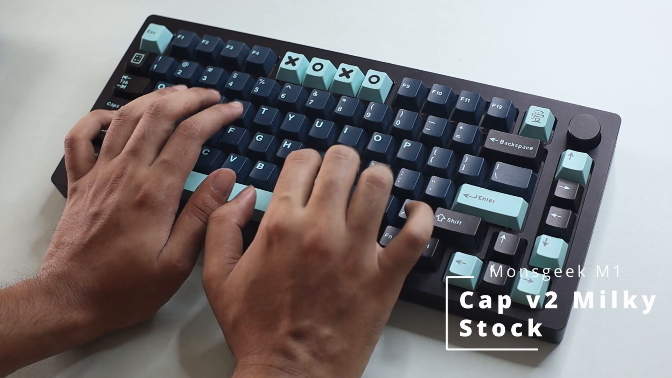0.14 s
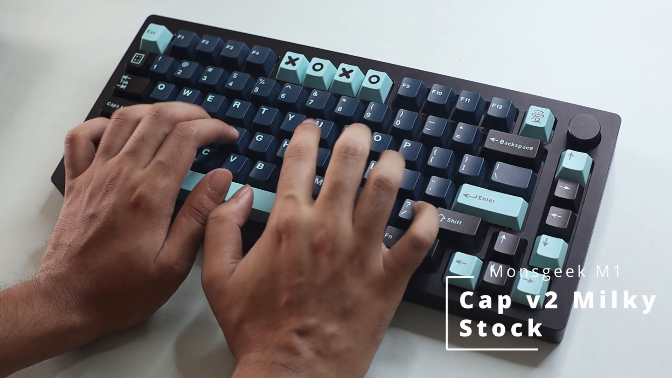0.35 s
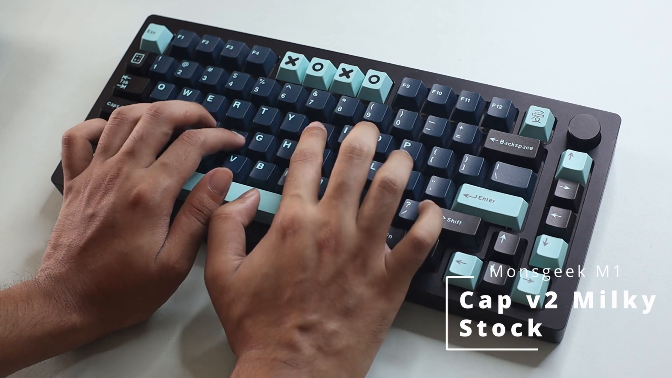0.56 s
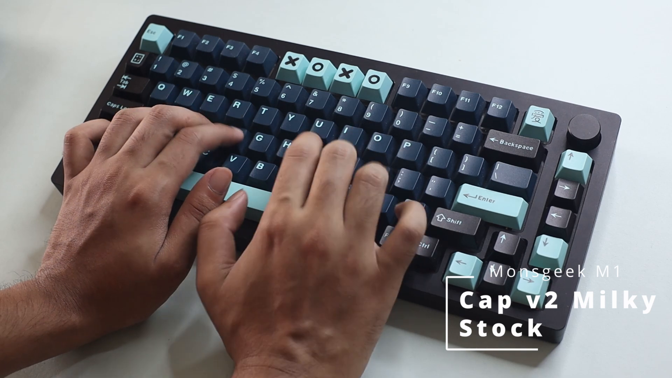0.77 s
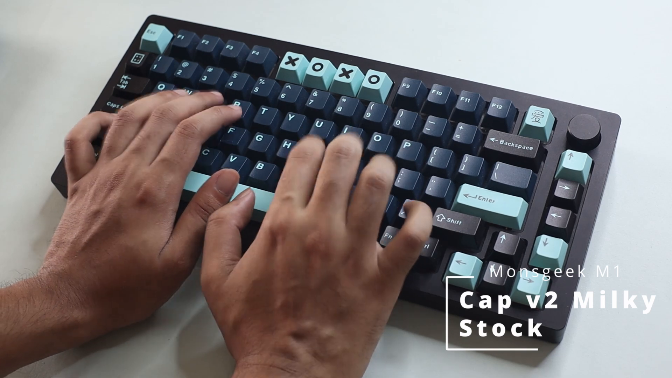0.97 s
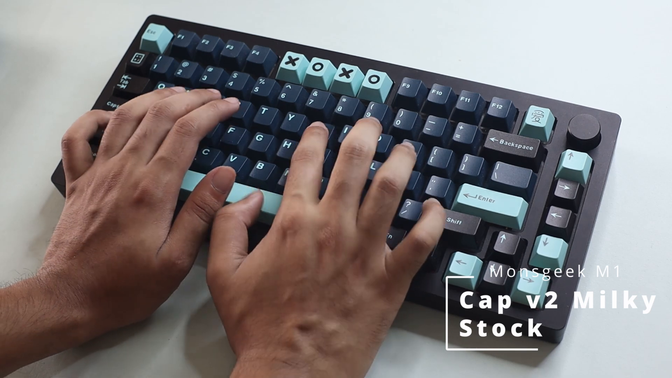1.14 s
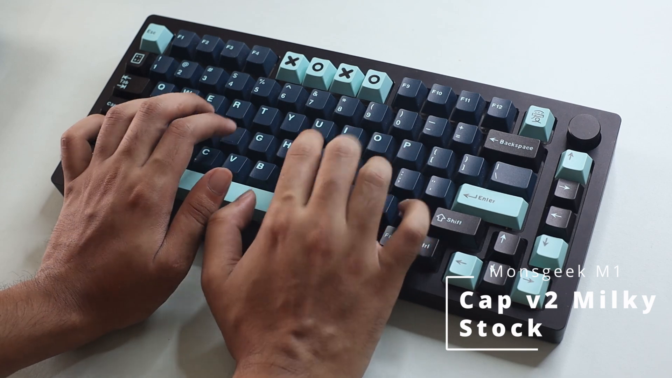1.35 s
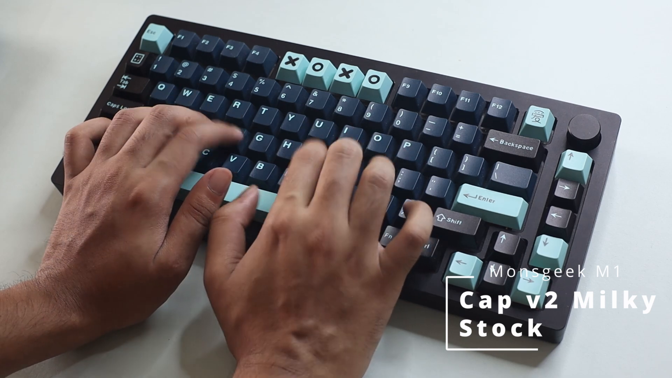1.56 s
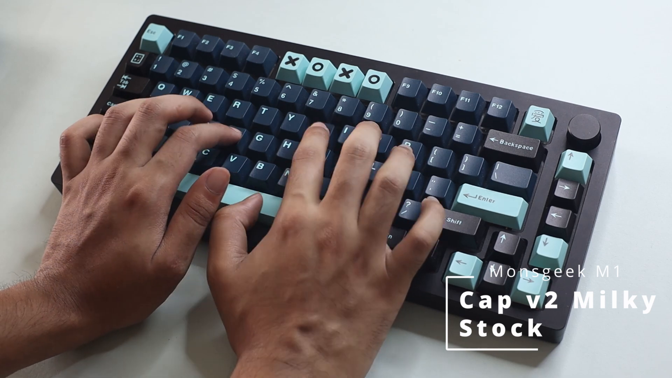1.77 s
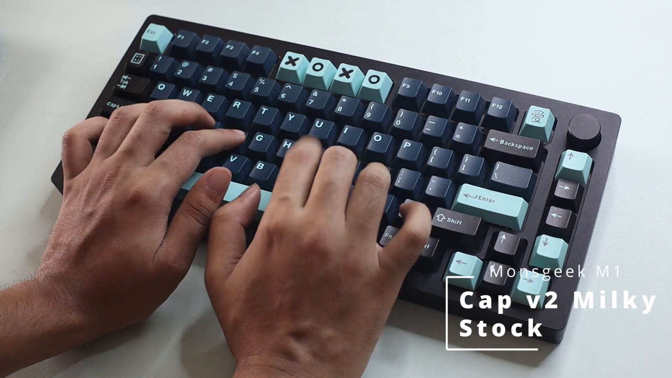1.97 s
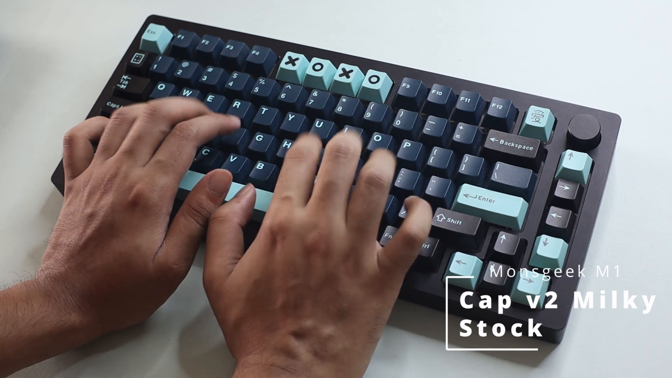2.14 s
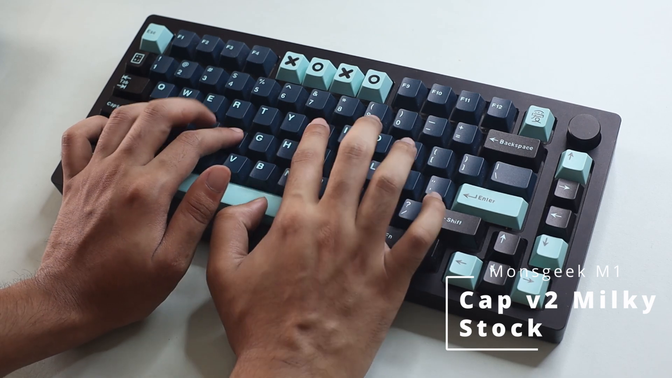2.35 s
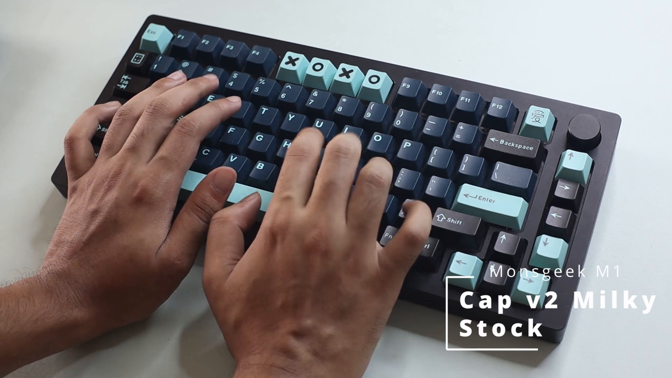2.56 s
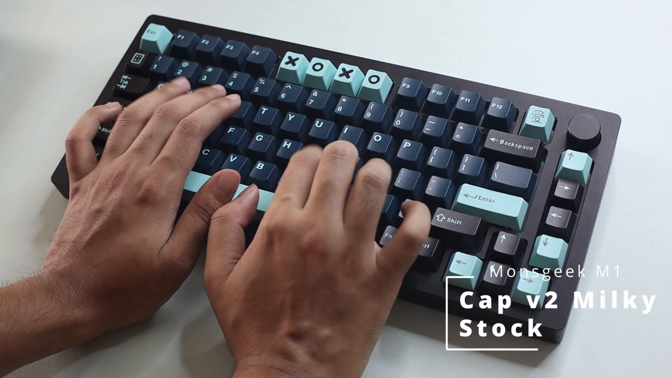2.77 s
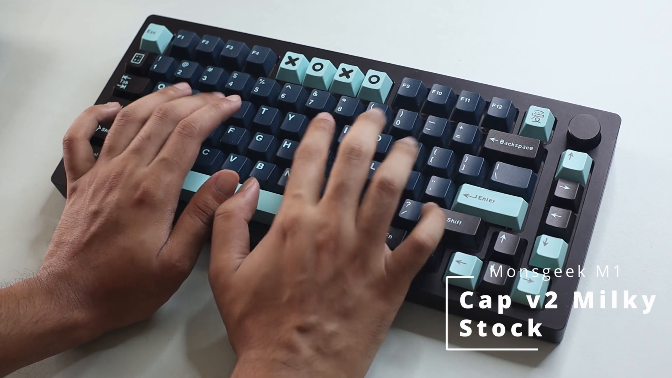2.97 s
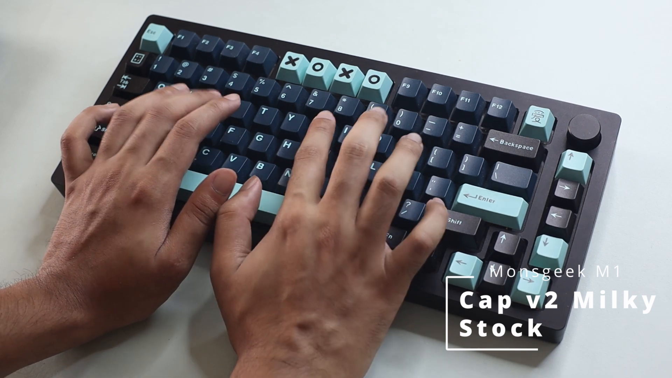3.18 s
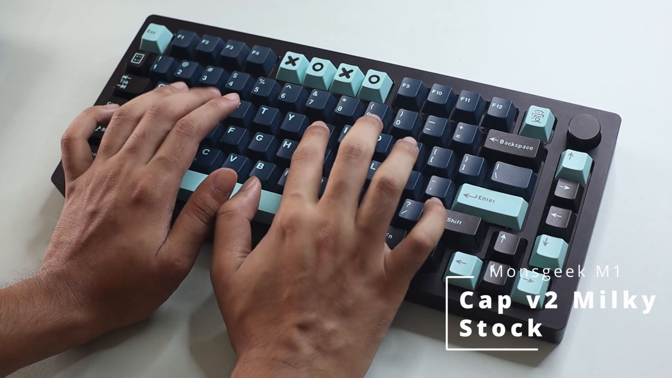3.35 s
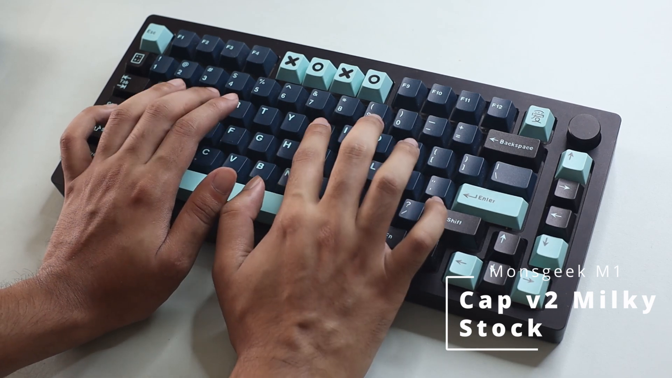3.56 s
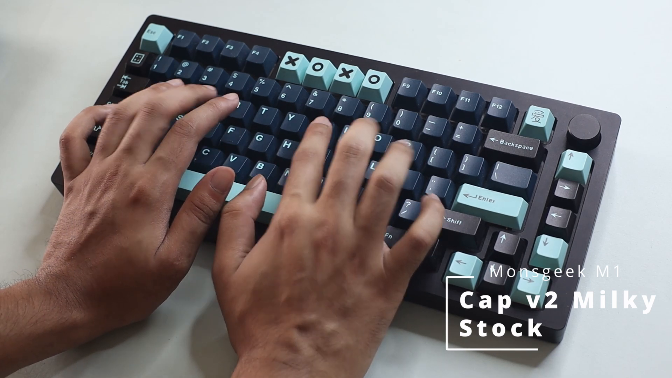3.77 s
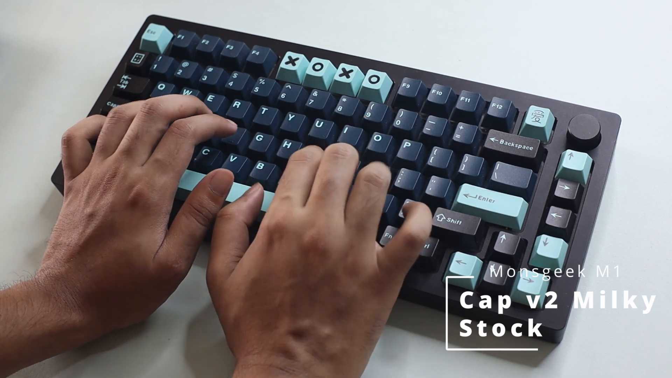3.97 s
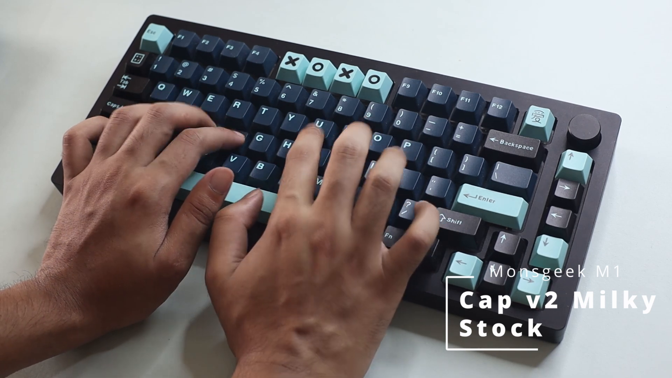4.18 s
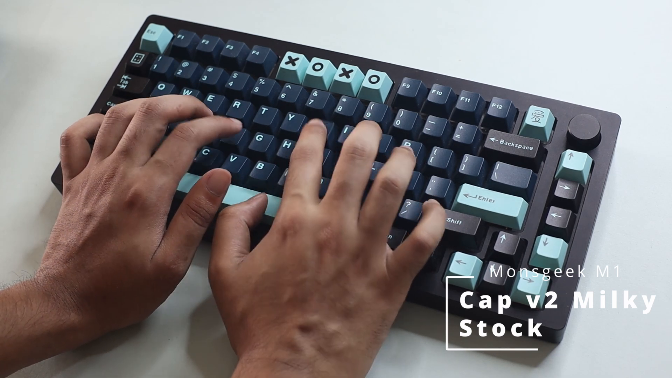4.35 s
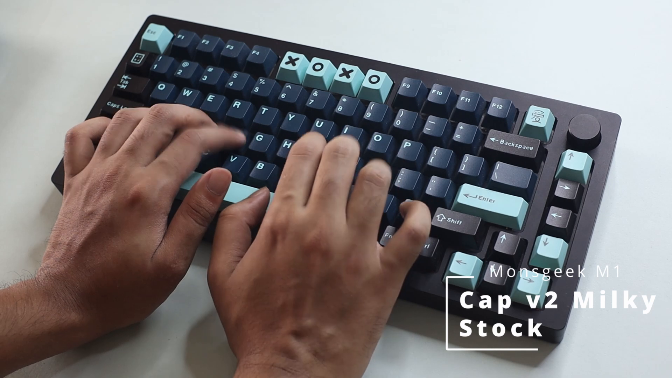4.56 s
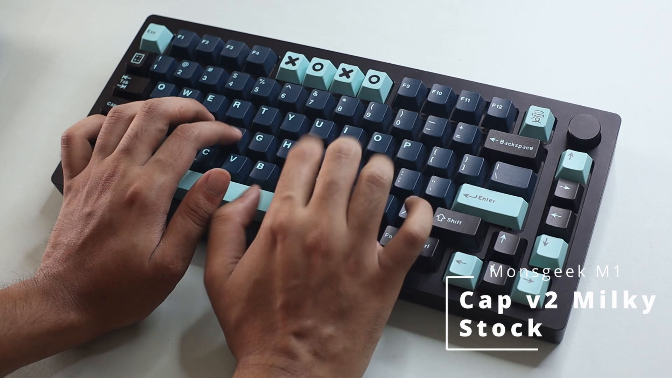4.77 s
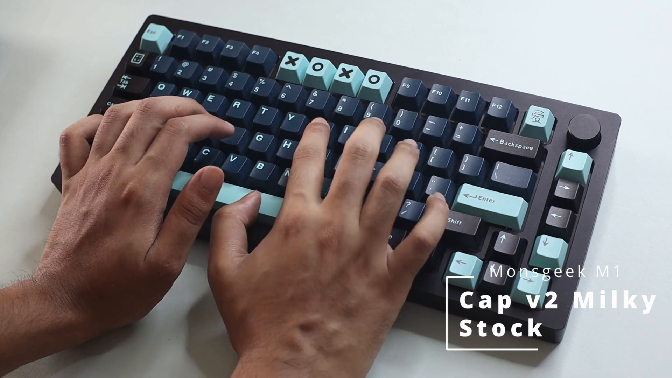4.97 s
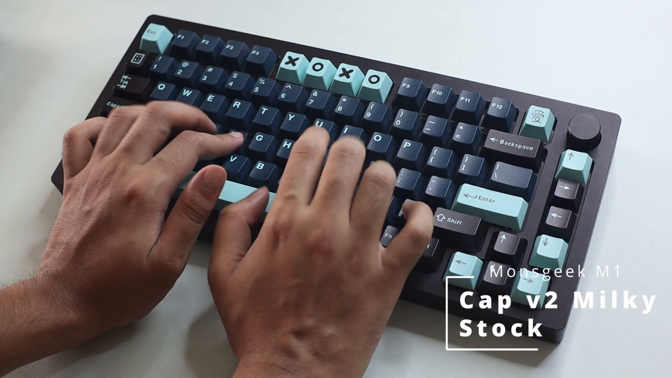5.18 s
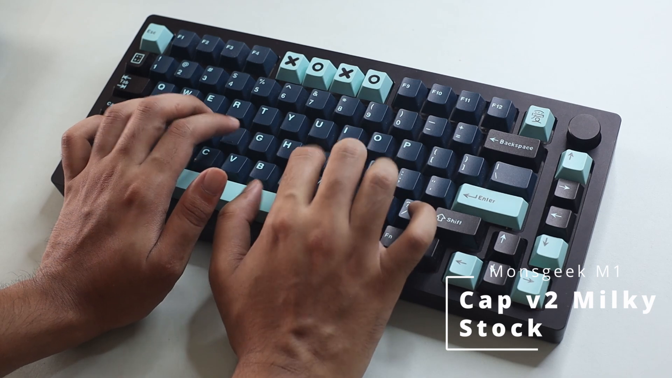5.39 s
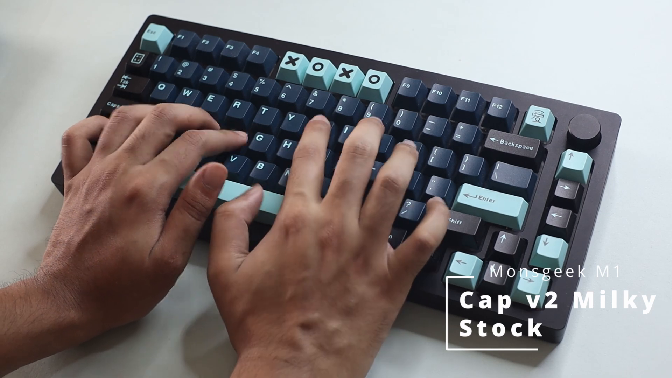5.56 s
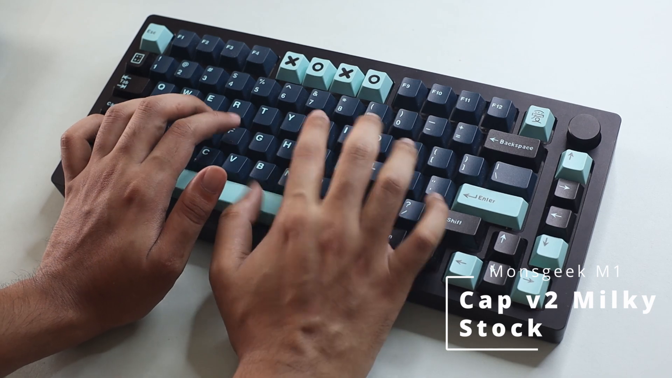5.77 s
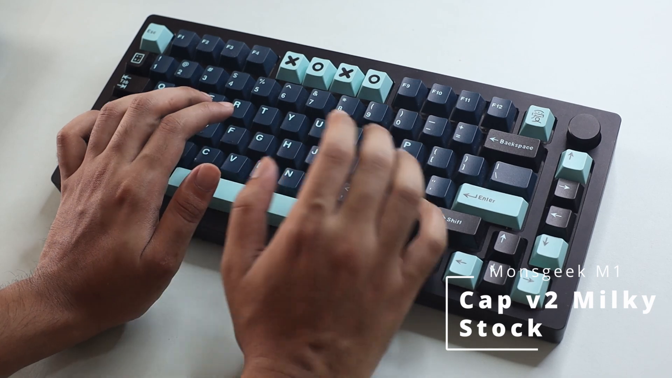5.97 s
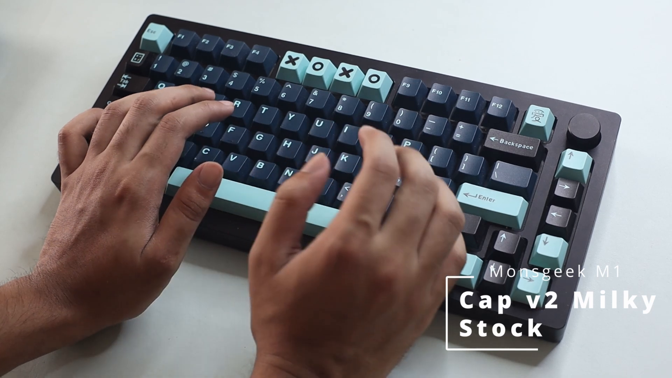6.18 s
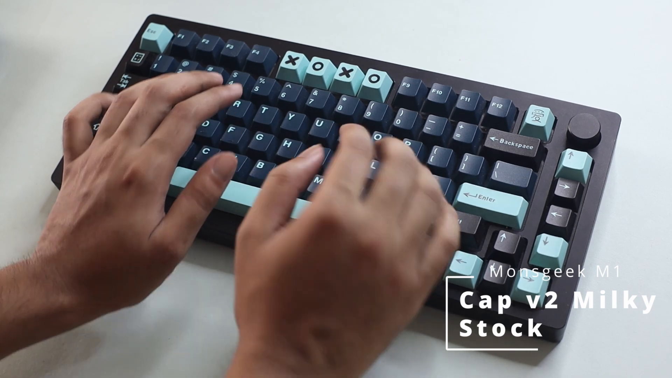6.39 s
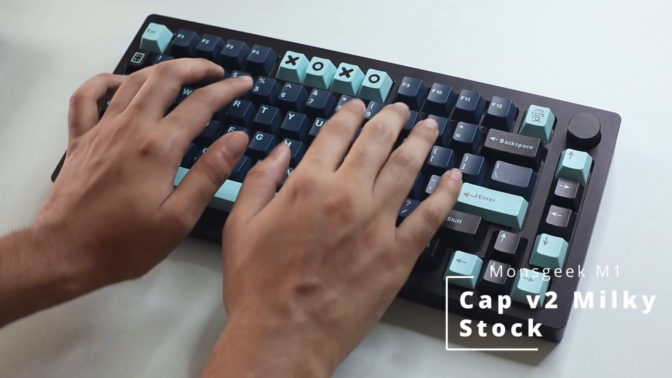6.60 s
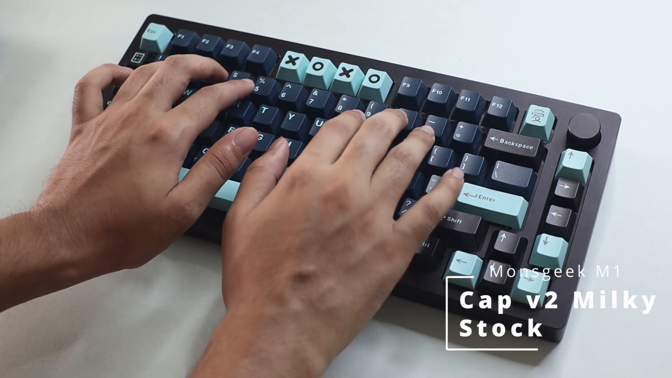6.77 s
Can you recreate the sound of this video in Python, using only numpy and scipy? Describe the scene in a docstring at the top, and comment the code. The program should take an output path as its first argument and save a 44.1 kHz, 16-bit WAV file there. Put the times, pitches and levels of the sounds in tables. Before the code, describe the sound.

Fast, steady typing on a mechanical keyboard, dry hollow clacks heard very close, louder rattly space bar hits, stopping just before six seconds into near silence.

```python
"""First comes the dying rattle of a space bar, then fast typing on a mechanical keyboard, close by on a desk.
Each key knocks on its housing: a few short decaying tones make the hollow clack, filtered noise its crack.
The long space bar also rattles on its steel wire: clumps of random taps ring its body, and the wire pings.
Stems scratch as they slide (shaped noise), and the desk and room answer with a short echo.
A far-off fan hums in a quiet room; after 5.9 s only four very faint knocks are left."""
import sys
import numpy as np
from scipy import signal
from scipy.fft import rfft, irfft
from scipy.io import wavfile
from scipy.ndimage import uniform_filter1d

SR = 44100
rng = np.random.default_rng(int(sys.argv[2]) if len(sys.argv) > 2 else 0)


def dump_mix(stems):
    """Bounce the given channels to the path in sys.argv[1] as a 16-bit WAV at rate SR."""
    frames = np.atleast_2d(stems).T  # one column per channel
    limited = np.clip(frames, -1, 1)  # hard clip at full scale
    pcm = np.round(limited * 32767).astype(np.int16)
    wavfile.write(sys.argv[1], SR, pcm)


N = 301203

# every knock of a key on the bottom or top of its travel:
# (time [s], clack level [dB], keycap pitch [Hz], crack level relative to the clack [dB])
KEY_KNOCKS = [(0.0113, -40, 3350.0, -4), (0.02, -38, 3910.0, -5), (0.0313, -27, 3080, -9),
              (0.1728, -33.5, 2680, -11.5), (0.1884, -35.5, 2550, -11.5), (0.2349, -33, 2950, -3.5),
              (0.2712, -41.5, 2620, -24), (0.3747, -29.5, 2300.0, -13.0), (0.5085, -27, 2950, -11.5),
              (0.5145, -36, 2500, -2), (0.571, -45, 3080.0, -7), (0.6014, -31, 2970, -5.5),
              (0.6314, -30.5, 2460, -11.5), (0.6707, -36.5, 2770, -20.5), (0.7402, -39, 2800, -5),
              (0.745, -31, 2400, -14), (0.8313, -33.0, 2360, -3), (0.8362, -26, 2630, -8),
              (0.8976, -30.5, 2630.0, -9.0), (0.9164, -28.0, 2700, -4.5), (0.9204, -32, 2600, -5),
              (0.9764, -41, 2700, -8), (0.9798, -34.5, 2820, -8.5), (1.0389, -30.5, 2430, -6.0),
              (1.0979, -38.0, 2370, -18), (1.1123, -28, 2250, -17), (1.1192, -37, 3000, -25),
              (1.1282, -23, 2500, -6.5), (1.2711, -36, 2630, -26), (1.2767, -26.5, 2520, -7.5),
              (1.2993, -35, 3100.0, -7), (1.3219, -20, 2650.0, -29), (1.3723, -39.5, 2300.0, -27),
              (1.407, -38.5, 2620, -3.5), (1.4514, -29, 2440, -14), (1.5385, -28.0, 2920, -6),
              (1.6104, -31, 2630, -9), (1.6353, -35.5, 2360, -6.0), (1.6505, -27, 2710, -11),
              (1.66, -43.5, 2680, -16.5), (1.6911, -34, 2580, -13.5), (1.7011, -28, 2220, -12.5),
              (1.7202, -30.5, 2880, -9), (1.7942, -38, 3150, -13), (1.8011, -39, 2300, -14.0),
              (1.8379, -35, 3240, -12), (1.844, -34, 2600.0, -33), (1.8582, -16, 2690, -17.0),
              (1.882, -41, 2350.0, -11.5), (1.9239, -42.0, 2230, -14), (1.963, -20, 2360, -12),
              (1.9951, -26.5, 2400, -6), (2.0161, -26.5, 2830, -10), (2.0636, -45, 3100, -5),
              (2.0829, -30, 3000, -6.5), (2.1215, -43, 2500, -6), (2.1249, -33, 2500, -4.5),
              (2.1404, -40, 2880.0, -13), (2.1779, -38.5, 2760, -9), (2.205, -42, 2550, -30.0),
              (2.2134, -34.5, 2470, -4), (2.2538, -37, 2430, -12), (2.2589, -42, 2500, -14),
              (2.2705, -30.5, 2200, -12), (2.3095, -31.0, 2390, -3.5), (2.3291, -27, 2820, -8),
              (2.3823, -43, 2920, -18), (2.3911, -23.5, 2900, -6.5), (2.4304, -32, 2500, -15),
              (2.473, -40, 3000, -23), (2.4827, -35.5, 2500, -12), (2.4965, -16.5, 2820, -12.5),
              (2.5546, -31.5, 2650, -10), (2.563, -31.5, 2550, -28), (2.6242, -27.5, 2370, -23),
              (2.6301, -37, 2500, -12), (2.64, -39.5, 3260, -6.0), (2.7669, -27.5, 2550, -4.5),
              (2.7715, -36, 2600, -8), (2.8506, -42.0, 2740, -18), (2.878, -34.5, 2940, -19),
              (2.9046, -43, 2620, -43), (2.9819, -39, 2280, -27), (3.0424, -35.0, 2380, -30),
              (3.1457, -27, 2450, -14), (3.2271, -38.5, 2530, -23), (3.261, -36.5, 2520, -28),
              (3.3155, -42, 2550.0, -25), (3.3368, -40, 3300, -23.0), (3.365, -26, 2280, -8.5),
              (3.4367, -49, 2970.0, -14), (3.4652, -25.5, 2440, -4.5), (3.536, -28.5, 2060, -9.5),
              (3.5415, -36, 2600, -12), (3.5574, -25.0, 2640, -12), (3.6486, -32, 2360, -8),
              (3.6543, -30, 2480, -14), (3.719, -43, 2960, -29), (3.7295, -35.5, 2370.0, -13),
              (3.7332, -41, 2500, -13), (3.745, -28.5, 2470, -16), (3.8313, -29.5, 2620, -13),
              (3.8397, -30.0, 2400, -16), (3.8998, -39, 2260, -19), (4.0252, -28.0, 2700, -8.5),
              (4.0542, -33.0, 2620, -8.5), (4.0921, -44, 3160, -15), (4.1144, -29.5, 2850, -5.5),
              (4.191, -30, 2380, -7.5), (4.206, -26, 2600, -9.5), (4.2255, -28, 2090, -14.5),
              (4.2874, -38, 2970, -18), (4.3271, -43, 3080.0, -20), (4.3378, -47, 2680, -32),
              (4.3529, -47.0, 2890.0, -18), (4.362, -42.5, 2550, -15), (4.3969, -25.5, 2640, -15.5),
              (4.4201, -34, 2590, -15), (4.4316, -46.0, 2480, -23), (4.4436, -19.5, 2720, -11),
              (4.5026, -36.0, 2560, -24), (4.5173, -39, 2790.0, -14), (4.5508, -28, 3100, 0.0),
              (4.624, -30, 2220, -2.5), (4.6445, -29, 2670, -11), (4.7034, -33.0, 2770.0, -5.5),
              (4.714, -34, 2800, -10), (4.758, -32, 2250, -6.5), (4.77, -45, 3000, -7),
              (4.8, -34.0, 2700, -2), (4.8422, -39, 2420.0, -15), (4.883, -36, 2340.0, -13),
              (4.89, -24, 2020, -8.5), (5.0541, -17, 2740, -13), (5.071, -44, 2600, -2),
              (5.122, -39.5, 2580.0, -12.5), (5.148, -31.5, 2500, -17.5), (5.168, -18, 2500, -9),
              (5.2192, -32.5, 2300, -4), (5.239, -25, 2650, -11.5), (5.2758, -46, 3170.0, 1),
              (5.2917, -28.5, 2970, -6.5), (5.3604, -46, 2360, -18.0), (5.3854, -40, 2550, -17),
              (5.421, -38.5, 2480, -17.5), (5.4374, -39.5, 2600, -19), (5.4897, -44, 2680, -44),
              (5.5639, -32.5, 2500, -16.5), (5.5956, -31.5, 2300, -4.5), (5.6039, -27, 2860, -10.5),
              (5.653, -40.5, 3040, -12.5), (5.6682, -31.5, 2900, -6), (5.7142, -24.5, 2520, -6.5),
              (5.756, -45.0, 2820, -17.5), (5.7653, -42, 2520.0, -28), (5.7832, -19, 2580, -20.0),
              (5.8145, -30.5, 2370, -8), (5.8276, -34, 2400, -7.5), (5.8985, -27.5, 3600, -1),
              (6.4004, -64, 2900, -2), (6.4619, -60, 2910, -5), (6.7778, -64, 2930, 5),
              (6.7853, -62.5, 2100.0, 2)]
# presses of the space bar: (landing time [s], landing rattle [dB], thumb touches earlier by [s],
# snap-back time [s], snap rattle [dB], snap rattle held for [s], wire ping [dB], low-mode gain from lift-off [dB])
BAR_PRESSES = [(-.12, -35, .024, -.008, -37, .006, -50, -4), (1.3219, -34, .024, 1.4506, -34, .01, -50, 2),
               (1.8582, -33, .02, 1.963, -35, .0066, -40, 0),
               (2.4965, -34, .025, 2.6242, -44.5, .008, -55, -3),
               (4.4436, -33, .017, 4.5508, -31, .0035, -27.5, -5),
               (5.0541, -35, .03, 5.168, -28, .006, -22.5, -1),
               (5.7832, -33, .028, 5.8981, -29.5, .0035, -19, 2)]
# single loud taps of the loose wire: (time [s], level [dB])
WIRE_TAPS = [(1.4365, -34), (1.4565, -16), (1.4665, -26), (1.4755, -28), (1.4795, -27), (4.5545, -21),
             (4.5828, -28), (4.5879, -30), (5.0331, -30), (5.172, -14), (5.9115, -22), (5.923, -24),
             (5.934, -29)]
# tones of the plate under the keys: (frequency [Hz], relative level [dB], time to fall 60 dB [s])
PLATE_TONES = [(1950, -5, .008), (2300, -1.5, .008), (2700, 0, .009), (3150, -2, .008), (3650, -3, .007)]
# housing resonances that colour the crack: (frequency [Hz], width [Hz], gain [dB])
HOUSING_MODES = [(5040, 1300, 9.5), (6370, 4500, 7.5), (8540, 2300, 9.5), (11980, 1000, 6),
                 (14800, 1500, -2)]
# thump of the whole board under every key: (frequency [Hz], width [Hz], gain [dB])
BOARD_MODES = [(150, 150, -22), (770, 110, -20), (1220, 130, -15), (1420, 160, -19)]
# resonances of the space bar's body: (frequency [Hz], width [Hz], gain [dB])
BAR_MODES = [(864, 300, -18), (1022, 200, -8), (1240, 150, -3), (1620, 220, -7.5), (2115, 300, -7.5),
             (2500, 430, -1.5), (3080, 730, -7.5), (3667, 860, -8), (4500, 650, -2), (5400, 900, -15),
             (6480, 303, -13), (8600, 1400, -15.5), (10310, 320, -12), (11500, 1500, -25.5),
             (14900, 500, -15.5)]
# colour of the stem scratch: (frequency [Hz], relative level [dB])
SCRATCH_SPECTRUM = [(900, -14), (1700, -5.5), (2500, 1.5), (3600, -10), (4600, -20.5), (8000, -20),
                    (12000, -20), (16000, -31)]
# echo of desk and room: (frequency [Hz], time to fall 60 dB [s], relative level [dB])
ECHO_BANDS = [(780, 0.075, -2), (2500, 0.24, -4.5), (4550, 0.16, -8), (6670, 0.22, -1), (12000, 0.23, -2.5),
              (15000, 0.048, -10)]
# colour of the air noise: (frequency [Hz], relative level [dB])
AIR_SPECTRUM = [(15, -46.5), (25, -28.5), (53, -7.5), (80, -15), (214, -8.5), (296, -10.5), (410, -15),
                (445, -11.5), (524, -17.5), (1060, -21.5), (1150, -24.5), (1510, -25), (4730, -43),
                (16500, -54)]
# fuzzy fan tones: (frequency [Hz], width [Hz], level [dB])
FAN_TONES = [(201.5, 7.6, -79.5), (220, 13, -75.5), (440, 8.9, -88.5), (487, 8, -89), (600, 8, -93)]

# keys
PLATE_LOW_HZ, PLATE_HIGH_HZ = 1500, 4650  # the plate falls silent outside these edges
CRACK_FROM_HZ = 3700
USUAL_HZ, USUAL_DB = 2600, -33  # a usual keycap and a usual knock
THUMP_DB_PER_OCTAVE = -18  # wide, low-pitched caps thump the board harder

# space bar; levels "under the rattle" are relative to the rattle of that press
LAND_HELD_S = .002  # the rattle of a landing stays full this long
LAND_BLOW_DB, SNAP_BLOW_DB = 24, 22.5  # peak of the first firm contact over the rattle
SCUFF_DB = -51  # thumb scuffing the loose bar until it lands
LIFT_S, LIFT_DB = .012, -25  # chatter as the thumb lets go: time before the snap, level under the rattle
BOUNCE_S, BOUNCE_FOR_S, BOUNCE_DB = .011, .017, -11  # wire bounce after a snap: delay, length, level under the rattle
LOW_MODES = 3  # how many of the bar's modes bend its whole length
LAND_LOW_DB = -1  # the thumb damps the low modes while it holds the bar
STIFF_MODE, STIFF_TAIL_DB = 8, -13  # the loose rattle hardly reaches the stiff mode near 4.5 kHz
WIRE_HZ, WIRE_T60_S, PING_DELAY_S = 13490, .013, .003
THUD_HZ, THUD_DB, THUD_T60_S = 95, -33, .1  # desk under the bar, level under the rattle

# scratch
SLIDE_DB, SLIDE_S = -34.5, .0088  # stem closing in on its stop: level under the knock, build-up time
RUB_DB, RUB_S = -91.5, .4  # swell of rubbing around a usual knock: level, length
RUB_FOLLOWS = .3  # dB of rubbing per dB of knock

# surroundings
ECHO_DB, AIR_DB = -19.5, -69.5
MIC_CUT_HZ, EDGE_HZ = 23, 16600  # lowest and highest pitch let through


def gain_of(db):
    """Turns decibels into amplitude."""
    return 10 ** (np.asarray(db) / 20)


def evened(x):
    """Scales a signal to an rms (average strength) of 1."""
    return x / np.sqrt(np.mean(x ** 2) + 1e-20)


def read(points, hz):
    """Reads a table between its points on a log-frequency axis."""
    f, value = np.transpose(points)
    return np.interp(np.log(hz + 1), np.log(f + 1), value)


def add(mix, s, sound):
    """Mixes a sound in at time s, cutting off what falls outside the scene."""
    at = round(s * SR)
    part = mix[max(at, 0):][:max(len(sound) + min(at, 0), 0)]
    part += sound[max(-at, 0):][:len(part)]


def resonate(x, modes):
    """Rings a body: each mode is a resonant filter, and neighbours have opposite sign."""
    out = np.zeros(len(x))
    for k, (hz, width, db) in enumerate(modes):
        b, a = signal.iirpeak(hz, hz / width, SR)
        out += (-1) ** k * gain_of(db) * signal.lfilter(b, a, x)
    return out


def noise(spectrum):
    """Makes steady noise of rms 1 with a given spectrum."""
    hz = np.fft.rfftfreq(N, 1 / SR)
    white = rfft(rng.standard_normal(N))
    return evened(irfft(white * gain_of(read(spectrum, hz)), N))


def keys():
    """Each knock rings the plate tones nearest its keycap pitch; a hard edge adds a short crack of treble."""
    t = np.arange(1024) / SR
    clacks, thumps, cracks = np.zeros((3, N))
    plate = signal.cheby2(4, 30, (PLATE_LOW_HZ, PLATE_HIGH_HZ), "band", fs=SR, output="sos")
    draws = rng.standard_normal((len(KEY_KNOCKS), len(t) + 2 * len(PLATE_TONES)))
    rebounds = rng.random((len(KEY_KNOCKS), 3, 2))
    plate_hz = np.array(PLATE_TONES)[:, 0]
    for (s, db, hz, crack_db), draw, rebound in zip(KEY_KNOCKS, draws, rebounds):
        # every knock is a little different in tuning and balance
        detune, tilt = draw[len(t):].reshape(2, -1)
        near_db = 3.5 * tilt - 65 * np.log2(plate_hz / hz) ** 2
        ring = np.zeros(len(t))
        for (f, level, t60), shift, near in zip(PLATE_TONES, detune, near_db):
            tone = np.sin(2 * np.pi * f * (1 + .05 * shift) * t)
            ring += gain_of(level + near - 60 * t / t60) * tone
        ring = signal.sosfilt(plate, ring)
        ring = gain_of(db) * ring / abs(ring).max()

        thump_db = db + THUMP_DB_PER_OCTAVE * np.log2(hz / USUAL_HZ) + 3 * tilt[0]
        add(thumps, s, gain_of(thump_db) * np.hanning(15))

        # a sharp burst of noise with a weaker, longer tail
        fade = gain_of(-60 * t / .005) + gain_of(-20 - 60 * t / .025)
        burst = gain_of(db + crack_db) * fade * draw[:len(t)]
        add(clacks, s, ring)
        add(cracks, s, burst)
        for when, size in rebound:  # the cap rocks and touches again, more weakly
            add(clacks, s + .001 + .009 * when, gain_of(-12 - 20 * size - 14 * when) * ring)
            add(cracks, s + .00059 + .009 * when, gain_of(-26 - 14 * size - 8 * when) * burst)
    treble = signal.butter(3, CRACK_FROM_HZ, "high", fs=SR, output="sos")
    cracks = signal.sosfilt(treble, cracks)
    return clacks + resonate(thumps, BOARD_MODES) + resonate(cracks, HOUSING_MODES)


def bar():
    """The bar chatters on its wire in uneven clumps of taps; the wire pings and the desk thuds."""
    t = np.arange(9000) / SR
    level, firm, rings, blows, low = np.zeros((5, N))
    wobble = 1 + .5 * evened(uniform_filter1d(rng.standard_normal(N), 30))
    for land, land_db, lead, snap, snap_db, snap_held, ping_db, low_db in BAR_PRESSES:
        # the low modes change as the thumb touches and as it lets go
        low[max(round((land - lead) * SR), 0):] = gain_of(LAND_LOW_DB)
        low[max(round((snap - LIFT_S) * SR), 0):] = gain_of(low_db)

        # light chatter: scuff before the landing, lift before the snap, bounce after it
        add(level, land - lead, gain_of(SCUFF_DB) * np.linspace(1, .6, round(lead * SR)))
        add(level, snap - LIFT_S, gain_of(snap_db + LIFT_DB) * np.ones(round(LIFT_S * SR)))
        bounce = np.linspace(1, .6, round(BOUNCE_FOR_S * SR))
        add(level, snap + BOUNCE_S, gain_of(snap_db + BOUNCE_DB) * bounce)

        landing = land, land_db, LAND_HELD_S, LAND_BLOW_DB
        snapping = snap, snap_db, snap_held, SNAP_BLOW_DB
        for s, db, held, blow_db in (landing, snapping):
            after = np.maximum(t - held, 0)
            add(firm, s, gain_of(db - 60 * after / .012))
            # the loose rattle dies fast at first, then slowly
            add(level, s, gain_of(db) * (gain_of(-5 - 60 * after / .025) + gain_of(-14 - 60 * after / .16)))
            add(blows, s, gain_of(db + blow_db) * np.hanning(9))
            add(rings, s, gain_of(db + THUD_DB - 60 * t / THUD_T60_S) * np.sin(2 * np.pi * THUD_HZ * t))

        rise = np.exp(np.minimum(t - PING_DELAY_S, 0) / .0008)
        ping = rise * gain_of(ping_db - 60 * np.maximum(t - PING_DELAY_S, 0) / WIRE_T60_S)
        soft_start = np.minimum(t / .0003, 1)
        add(rings, snap, ping * np.sin(2 * np.pi * WIRE_HZ * t) * soft_start)

    clumps = gain_of(3 * evened(uniform_filter1d(rng.standard_normal(N), 60)))
    struck = rng.random(N) < 6000 / SR  # about 6000 taps a second
    taps = clumps * struck * rng.standard_normal(N) * 5
    loose = level * taps
    for (s, db), grit in zip(WIRE_TAPS, rng.standard_normal((len(WIRE_TAPS), 100))):
        add(loose, s, gain_of(db - 60 * t[:len(grit)] / .004) * grit)

    drive = firm * taps + loose + blows
    low_part = resonate(low * drive, BAR_MODES[:LOW_MODES])
    high_part = resonate(drive, BAR_MODES[LOW_MODES:])
    # the loose share of the stiff mode is mostly taken out again
    stiff = resonate(loose, BAR_MODES[STIFF_MODE:STIFF_MODE + 1])
    spared = (1 - gain_of(STIFF_TAIL_DB)) * stiff
    return low_part - high_part - spared + rings * wobble


def scratch():
    """Stems rub in their housings: a patchy hiss thickens with the typing and swells just before each knock."""
    level = np.zeros(N)
    before = np.arange(-1500, 0) / SR
    for at, knock_db, *_ in KEY_KNOCKS:
        rub_db = RUB_DB + RUB_FOLLOWS * (knock_db - USUAL_DB)
        add(level, at - RUB_S / 2, gain_of(rub_db) * np.hanning(round(RUB_S * SR)))
        add(level, at + before[0], gain_of(knock_db + SLIDE_DB) * np.exp(before / SLIDE_S))
    patches_db = evened(uniform_filter1d(rng.standard_normal(N), 150))
    return level * gain_of(patches_db) * noise(SCRATCH_SPECTRUM)


def echo(x):
    """Sparse reflections of random sign follow a short gap, each band dying at its own speed."""
    out = np.zeros(N)
    turn = np.arange(N) / SR * 7 * np.pi
    f, t60, db = np.transpose(ECHO_BANDS)
    for k in range(3):  # three different tails take turns
        taps = np.zeros(SR // 4)
        at = np.arange(220, len(taps) - 20, 12)
        taps[at + rng.integers(0, 12, len(at))] = rng.choice([-1., 1.], len(at))
        # split into bands over time, fade each band, put them together again
        hz, t, z = signal.stft(taps, SR, nperseg=128)
        fade_db = np.interp(hz, f, db)[:, None] - 60 * t / np.interp(hz, f, t60)[:, None]
        tail = signal.istft(z * gain_of(fade_db), SR, nperseg=128)[1]
        share = np.sqrt(2 / 3) * np.cos(turn + k * np.pi / 3)
        out += signal.oaconvolve(x * share, tail / np.linalg.norm(tail))[:N]
    return out


def room_tone():
    """Fuzzy fan tones, made by narrow filters on noise, lie over low air noise."""
    hum = np.zeros(N)
    for hz, width, db in FAN_TONES:
        hum += gain_of(db) * evened(resonate(rng.standard_normal(N), [(hz, width, 0)]))
    return gain_of(AIR_DB) * noise(AIR_SPECTRUM) + hum


def scene():
    """Adds up the keyboard, its echo, the scratching stems and the room."""
    hits = keys() + bar()
    return (hits + gain_of(ECHO_DB) * echo(hits) + scratch() + room_tone())[None]


def record(dry):
    """The microphone drops the deepest bass; a steep filter then removes the highest treble."""
    bass_cut = signal.butter(3, MIC_CUT_HZ, "high", fs=SR, output="sos")
    heard = signal.sosfilt(bass_cut, dry)
    treble_cut = signal.firwin(255, EDGE_HZ, window=("kaiser", 9), fs=SR)
    return signal.oaconvolve(heard, treble_cut[None], "same")


dry = scene()
out = record(dry)
dump_mix(out)
```